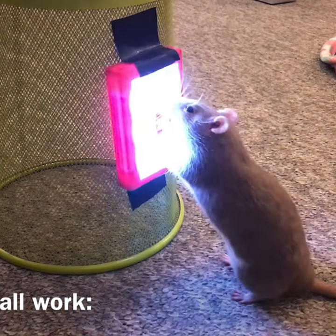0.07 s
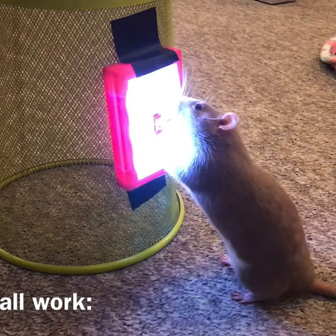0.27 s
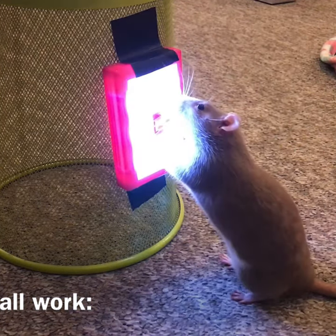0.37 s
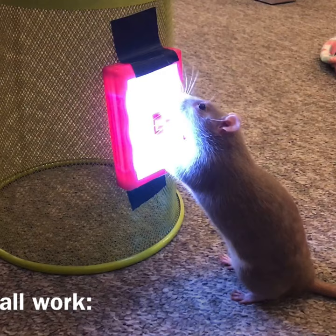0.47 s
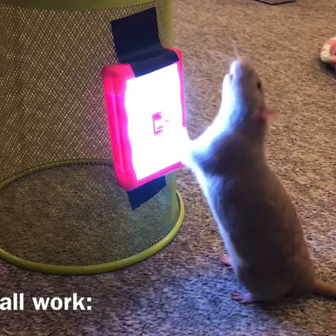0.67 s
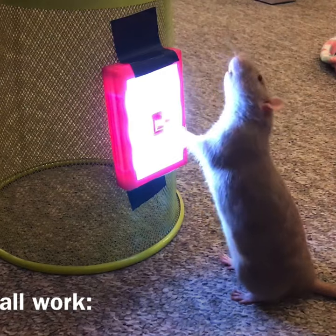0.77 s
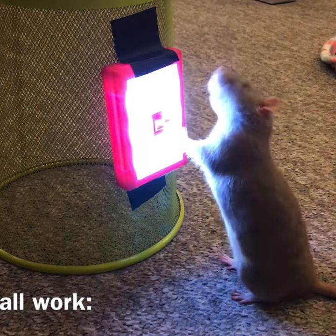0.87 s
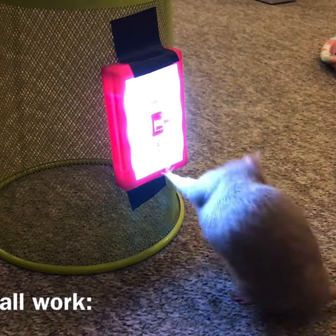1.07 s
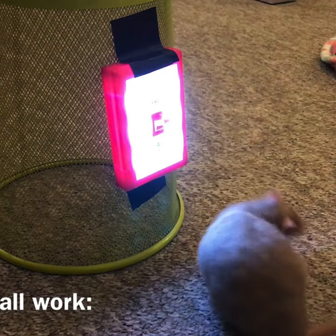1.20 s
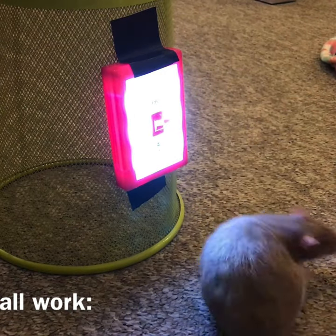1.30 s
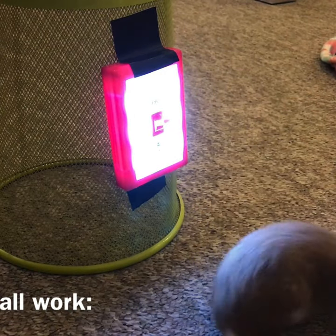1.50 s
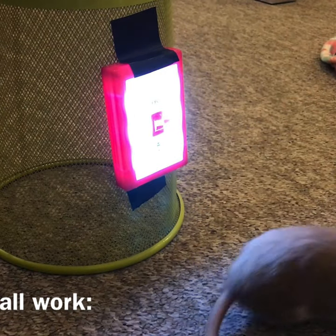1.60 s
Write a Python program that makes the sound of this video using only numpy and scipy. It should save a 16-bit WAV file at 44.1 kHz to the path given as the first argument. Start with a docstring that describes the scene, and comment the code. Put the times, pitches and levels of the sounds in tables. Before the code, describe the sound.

Two quick clicks of a plastic light switch, followed by faint paw pats on carpet.

```python
"""The rocker of a small plastic switch light snaps in and springs back, worked by a pet rat.
The light is taped to a wire basket in a quiet carpeted room. Each snap strikes the damped modes
of the case; claws tick on it first, and the room rings briefly. Fur and paws brush about and
the rat drops to the carpet (shaped noise), over a faint wavering low rumble and hiss."""
import sys
import numpy as np
from scipy import signal
from scipy.fft import rfft, irfft, next_fast_len
from scipy.io import wavfile

SR = 44100
rng = np.random.default_rng(int(sys.argv[2]) if len(sys.argv) > 2 else 0)


def to_wav(sig):
    """Store sig (one row per channel, or 1-D mono) as 16-bit WAV at the path in sys.argv[1].

    Samples outside -1..1 are clipped; the rate is SR.
    """
    pcm = np.clip(np.atleast_2d(sig), -1, 1) * 32767
    pcm = np.round(pcm).astype(np.int16)
    wavfile.write(sys.argv[1], SR, pcm.T)  # frames by channels


N = 72765

# room air: freq_hz, gain_db
AIR_SPECTRUM = [(25, -25.5), (45, -7), (70, -3.5), (120, -1.5), (200, 0.5), (350, -5.5), (500, -10.5),
                (700, -11), (1000, -20.5), (2200, -21.5), (3300, -24), (5500, -23.5), (6500, -27.5),
                (9000, -27.5), (15500, -32)]
# wavering low tone: time_s, centre_hz, relative_db
RUMBLE_TRACK = [(0, 228.8, -105), (.2, 330, -72), (0.282, 401.4, -76), (0.331, 237.2, -77.5),
                (0.452, 291.3, -71.5), (0.586, 401.3, -74), (0.631, 149.2, -70.5), (.68, 191.8, -61.5),
                (.70, 404.6, -76.5), (.79, 420.9, -76.5), (0.861, 267.1, -70.5), (.89, 169.5, -68.5),
                (.945, 168, -59), (1.001, 160.1, -64.5), (1.039, 249.5, -69.5), (1.13, 300, -71),
                (1.21, 207, -66.5), (1.259, 173, -59.5), (1.309, 321.4, -71), (1.36, 399.6, -74),
                (1.399, 338.3, -68), (1.435, 222.7, -68.5), (1.469, 350, -78), (1.512, 400, -66.5),
                (1.572, 265.2, -70), (1.65, 321, -75.5)]
# fur and paws brushing: centre_s, sigma_s, level_db, tilt_db_per_octave
BRUSHES = [(0.097, 0.0088, -64.5, -1.5), (.56, 0.038, -75, -1.5), (0.791, 0.025, -72, -1),
           (0.948, 0.07, -76, -0.5), (1.078, 0.038, -74.5, -3), (1.235, 0.017, -71.5, 0)]
# fur friction: freq_hz, gain_db
FUR_SPECTRUM = [(300, 3), (800, 2), (1500, 0), (4300, -4), (5500, 4), (6800, -4.5), (8800, -1.5),
                (11500, -6), (14500, -8)]
# paws on carpet: start_s, level_db, tilt_db_per_octave
PAW_PATS = [(1.055, -65, 0.5), (1.082, -64, 1), (1.133, -53.5, -2), (1.256, -61.5, -2.5),
            (1.382, -68.5, 2.5), (1.484, -63, -1)]
# paw pad impact: freq_hz, gain_db
PAD_SPECTRUM = [(60, -17), (200, 4.5), (430, -8.5), (580, 0), (740, -6), (900, -9.5), (1200, -15.5),
                (2200, -20.5), (4200, -23.5), (8000, -34), (16000, -44)]
# near surfaces: delay_s, gain_db
REFLECTIONS = [(.0027, -42), (.0046, -14), (.0063, -25.5), (.0076, -16.5), (0.0132, -20), (.0158, -26)]
# room tail decay: freq_hz, t60_s
TAIL_DECAY = [(300, 0.31), (1500, 0.32), (3300, .33), (6000, 0.33)]
# room tail colour: freq_hz, gain_db
TAIL_SPECTRUM = [(300, -20), (800, -13), (1250, -9), (1460, -15), (1700, -10), (2200, -3.5), (3000, -12),
                 (4200, 0.5), (5000, -12.5), (5800, -6), (8000, -16.5)]
# plastic case modes: freq_hz, rise_s, press_gain_db, release_gain_db
CASE_MODES = [(480, 0.00081, -48, -41), (788.4, 0.0017, -50.5, -40), (1108, 0.00038, -29, -30.5),
              (1442, 0.0013, -21, -24.5), (2800, 0.00077, -27.5, -24.5), (3089, 0.00079, -20.5, -23.5),
              (3655, 0.0018, -32.5, -32.5), (4890, .00093, -37.5, -34), (5755, 0.0012, -53.5, -42),
              (7160, 0.000561, -60.5, -51.5)]
# claws on the case: start_s, gain_db
CLAW_TAPS = [(0.1284, -39.5), (0.1653, -37), (0.2073, -45)]
# claw scratch: freq_hz, gain_db
SCRATCH_SPECTRUM = [(200, -7.5), (750, 10.5), (1100, 5), (2200, 3.5), (4000, -7.5), (5700, -3.5),
                    (7000, -12), (15000, -13.5)]
# rocker press, then release: start_s, gain_db
ROCKER_SNAPS = [(.2185, 0.5), (.3681, -3)]

AIR_DB = -67.5
RUMBLE_TRIM_DB, RUMBLE_WIDTH_HZ, RUMBLE_ROUGHNESS = -0.5, 36, 0.35
FUR_PIVOT_HZ = 4000
PAD_PIVOT_HZ, PAD_RISE_S = 500, 0.0043
TAIL_BUILD_S = 0.011
RADIATION_HZ = 326  # the small case radiates little below this
SCRATCH_RELATIVE_DB, SCRATCH_T60_S = -20.5, 0.031
LOW_CUT_HZ, HIGH_CUT_HZ = 41.33, 15700
TIME_S = np.arange(N) / SR


def amp(db):
    """Decibels to gain."""
    return 10 ** (np.asarray(db) / 20)


def unit_rms(x):
    """Scale to rms 1."""
    return x / np.sqrt(np.mean(x ** 2) + 1e-20)


def curve_at(points, hz):
    """Interpolate (freq_hz, value) rows on a log frequency axis."""
    freqs_hz, values = np.transpose(points)
    return np.interp(np.log(hz + 1), np.log(freqs_hz + 1), values)


def filtered(x, response):
    """Apply a frequency response by FFT."""
    size = next_fast_len(N + SR // 2)
    return irfft(rfft(x, size) * response(np.fft.rfftfreq(size, 1 / SR)), size)[:N]


def noise(colour_db):
    """Coloured noise, rms 1."""
    return unit_rms(filtered(rng.standard_normal(N), lambda hz: amp(colour_db(hz))))


def tilted_noise(spectrum, db_per_octave, pivot_hz):
    """Noise with a tilted spectrum, rms 1."""
    return noise(lambda hz: curve_at(spectrum, hz) + db_per_octave * np.log2((hz + 1) / pivot_hz))


def since(start_s):
    """Seconds since start_s, zero before."""
    return np.maximum(TIME_S - start_s, 0)


def room_air():
    """Steady bass-heavy hiss."""
    return amp(AIR_DB) * noise(lambda hz: curve_at(AIR_SPECTRUM, hz))


def rumble():
    """Faint wandering low tone; slow noise roughens its amplitude and phase."""
    def jitter():
        return RUMBLE_ROUGHNESS * noise(lambda hz: -20 * np.log10(1 + (hz / RUMBLE_WIDTH_HZ) ** 2))

    time_s, centre_hz, relative_db = np.transpose(RUMBLE_TRACK)
    phase = 2 * np.pi * np.cumsum(np.interp(TIME_S, time_s, centre_hz)) / SR
    tone = unit_rms((1 + jitter()) * np.cos(phase) + jitter() * np.sin(phase))
    return amp(RUMBLE_TRIM_DB + np.interp(TIME_S, time_s, relative_db)) * tone


def fur_brushes():
    """Gaussian swells of friction hiss as the rat moves."""
    out = np.zeros(N)
    for centre_s, sigma_s, level_db, tilt in BRUSHES:
        envelope = np.exp(-0.5 * ((TIME_S - centre_s) / sigma_s) ** 2)
        out += amp(level_db) * envelope * tilted_noise(FUR_SPECTRUM, tilt, FUR_PIVOT_HZ)
    return out


def swell(age_s, rise_s):
    """Impact envelope: 1 at rise_s, then a fast decay."""
    return (age_s / rise_s * np.exp(1 - age_s / rise_s)) ** 2


def paw_pats():
    """Soft pads hit the carpet: dull noise bursts."""
    out = np.zeros(N)
    for start_s, level_db, tilt in PAW_PATS:
        envelope = swell(since(start_s), PAD_RISE_S)
        out += amp(level_db) * envelope * tilted_noise(PAD_SPECTRUM, tilt, PAD_PIVOT_HZ)
    return out


def room(x):
    """Near reflections plus a diffuse tail; no direct sound."""
    near = filtered(x, lambda hz: sum(amp(gain_db) * np.exp(-2j * np.pi * hz * delay_s)
                                      for delay_s, gain_db in REFLECTIONS))
    band_hz, age_s, frames = signal.stft(rng.standard_normal(SR // 2), SR, nperseg=256)
    decay = amp(-60 * age_s / curve_at(TAIL_DECAY, band_hz)[:, None])
    tail = signal.istft(frames * decay, SR, nperseg=256)[1]
    tail *= 1 - np.exp(-(np.arange(len(tail)) / SR / TAIL_BUILD_S) ** 2)
    diffuse = signal.fftconvolve(x, tail / np.linalg.norm(tail))[:N]
    return near + filtered(diffuse, lambda hz: amp(curve_at(TAIL_SPECTRUM, hz)))


def case_ring(start_s, stroke):
    """Heavily damped modes of the struck case; stroke 0 = press, 1 = release."""
    age_s = since(start_s)
    ring = sum(amp(gains_db[stroke]) * swell(age_s, rise_s) * np.sin(2 * np.pi * hz * age_s)
               for hz, rise_s, *gains_db in CASE_MODES)
    return signal.sosfilt(signal.butter(2, RADIATION_HZ, "high", fs=SR, output="sos"), ring)


def claw_ticks():
    """Each claw taps the case lightly, with a tiny scratch."""
    out = np.zeros(N)
    for start_s, gain_db in CLAW_TAPS:
        age_s = since(start_s)
        envelope = (age_s > 0) * amp(SCRATCH_RELATIVE_DB - 60 * age_s / SCRATCH_T60_S)
        scratch = envelope * noise(lambda hz: curve_at(SCRATCH_SPECTRUM, hz))
        out += amp(gain_db) * (case_ring(start_s, stroke=0) + scratch)
    return out


def rocker_snaps():
    """Press and release as two signals, each with its own weighting of the case modes."""
    return [amp(gain_db) * case_ring(start_s, stroke)
            for stroke, (start_s, gain_db) in enumerate(ROCKER_SNAPS)]


def scene():
    """Mono mix; only snaps and claws excite the room."""
    clicks = sum(hit + room(hit) for hit in rocker_snaps() + [claw_ticks()])
    return (clicks + paw_pats() + fur_brushes() + rumble() + room_air())[None]


def record(dry):
    """Band limit: fourth-order low cut, brick-wall high cut."""
    def response(hz):
        return (hz < HIGH_CUT_HZ) * hz ** 4 / np.hypot(hz ** 4, LOW_CUT_HZ ** 4)

    return filtered(dry[0], response)[None]


dry = scene()
out = record(dry)
to_wav(out)
```